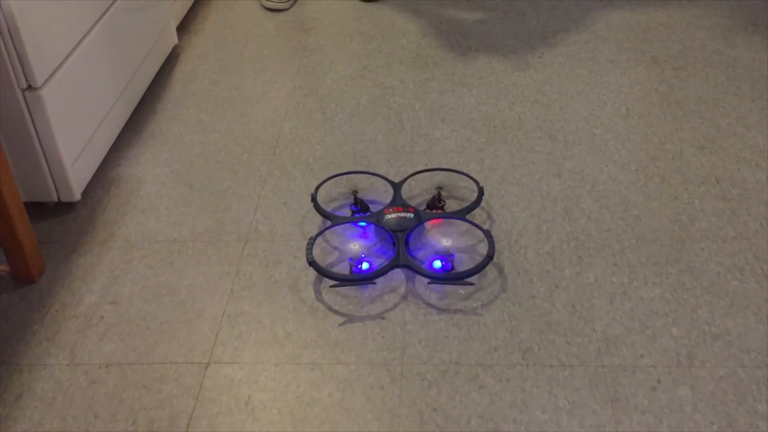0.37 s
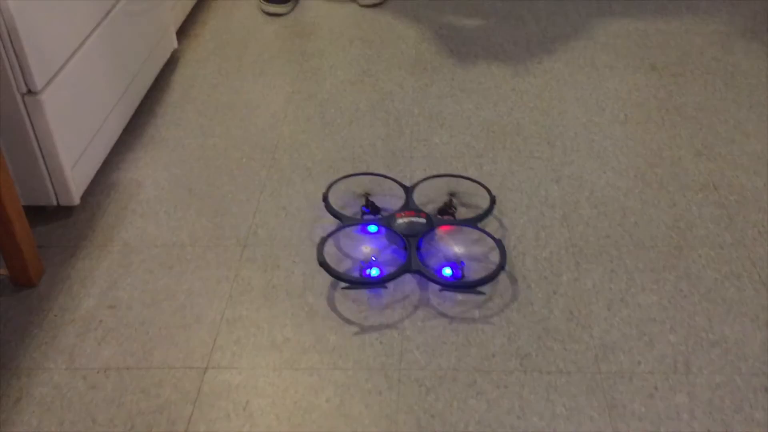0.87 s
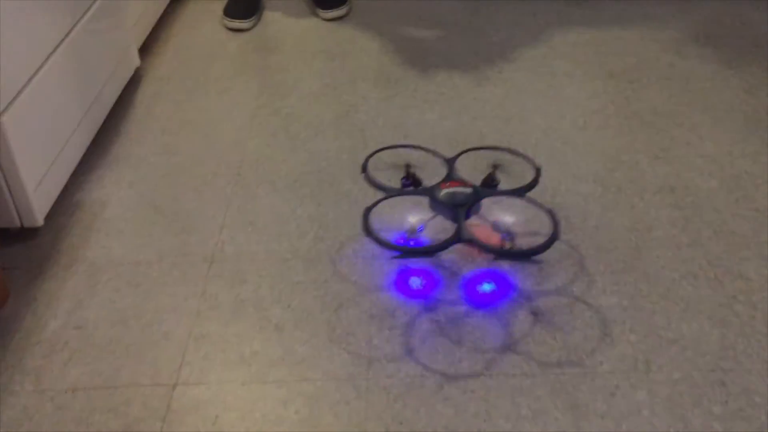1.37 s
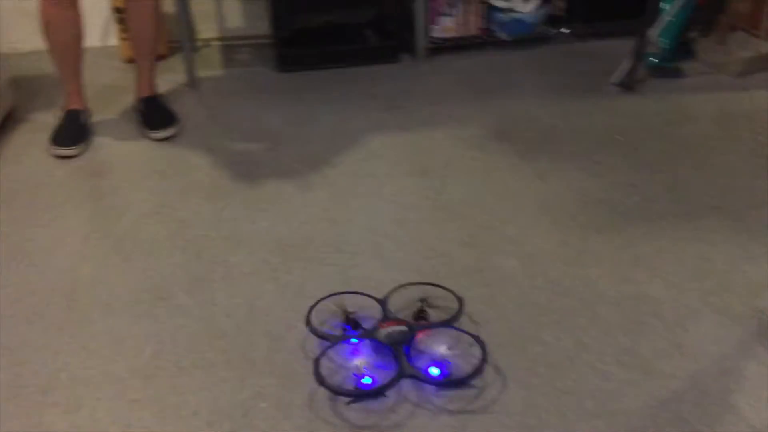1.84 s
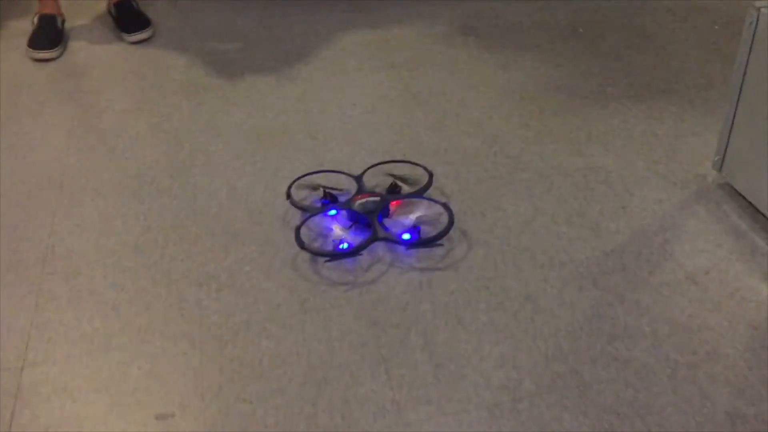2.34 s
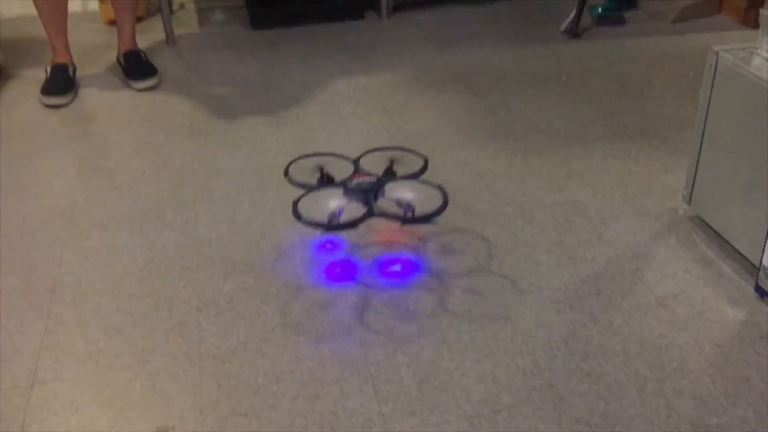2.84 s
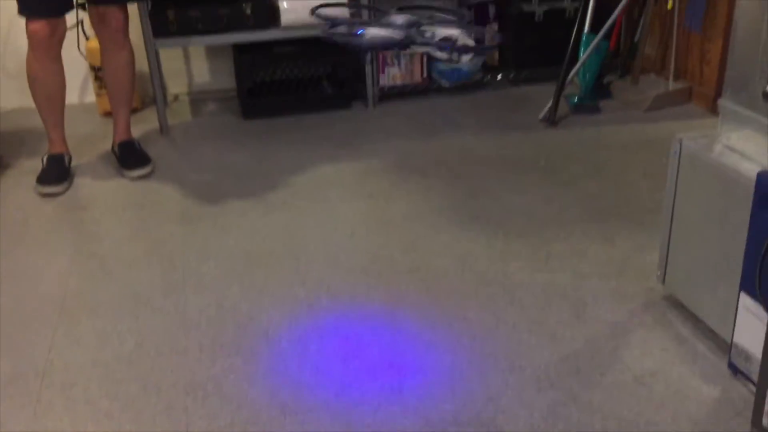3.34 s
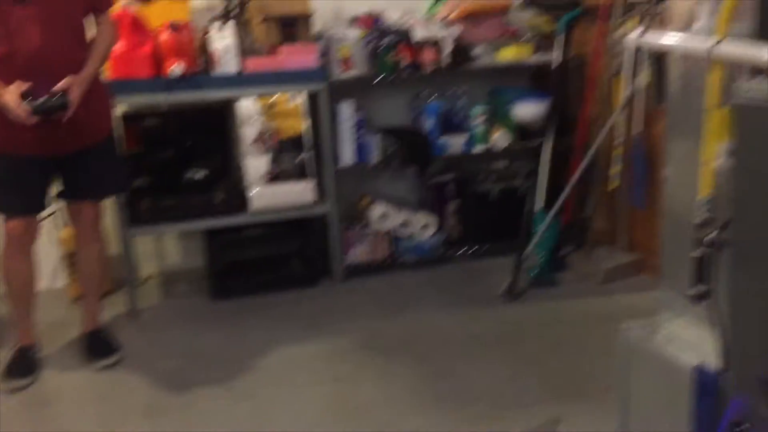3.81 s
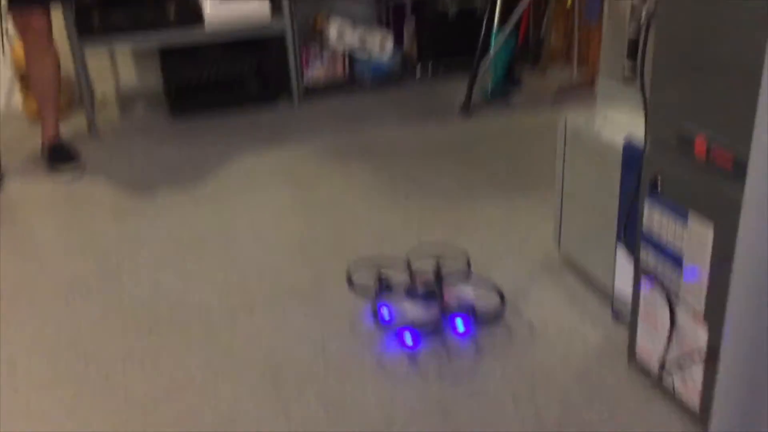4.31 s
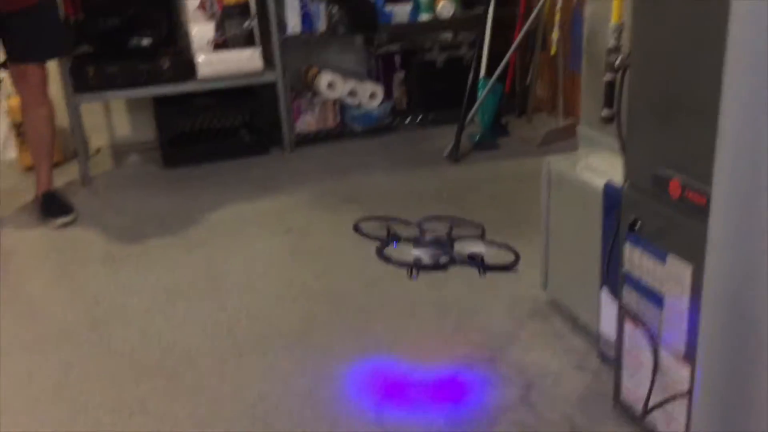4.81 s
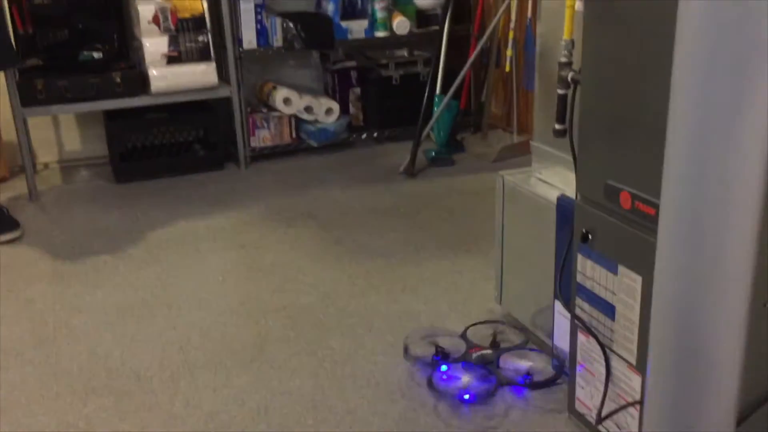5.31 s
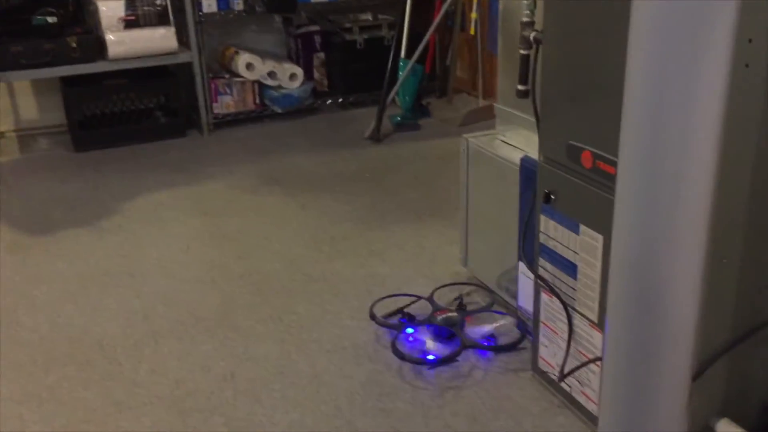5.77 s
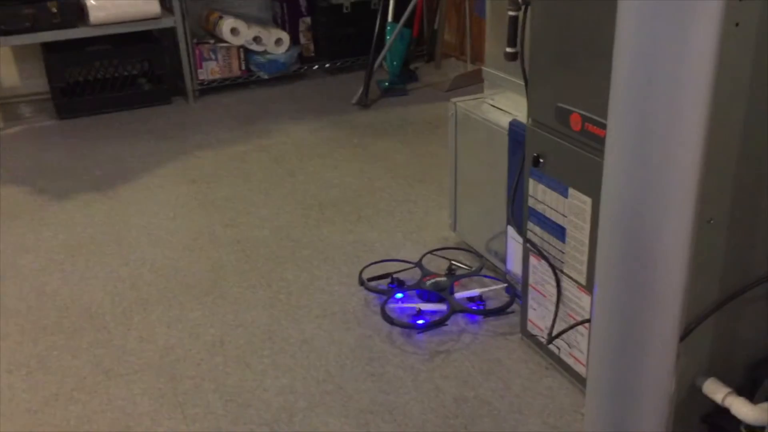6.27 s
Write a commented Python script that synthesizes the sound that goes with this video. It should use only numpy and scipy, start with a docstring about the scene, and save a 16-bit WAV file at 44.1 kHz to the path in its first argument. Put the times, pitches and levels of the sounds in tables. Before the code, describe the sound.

Thin geared motors rev up and coast down three times, with rattling plastic, airy blade hiss and clattering landings over faint ventilation rumble.

```python
"""Toy drone hopping in a room

A small four-rotor drone hops three times over a hard floor. Each geared motor whines at its tooth-mesh
rate, gear play rattles the light frame, the arms hum and turbulent air hisses off the blades.
Each hop ends in a bouncing knock: cracks and chatter that ring the frame modes.
Feedback delays give the room's echo; ventilation rumbles underneath as coloured noise."""
import sys
import numpy as np
from scipy import signal
from scipy.fft import rfft, irfft, next_fast_len
from scipy.io import wavfile
from scipy.ndimage import uniform_filter1d

SR = 44100
rng = np.random.default_rng(int(sys.argv[2]) if len(sys.argv) > 2 else 0)


def generate_wav(signal):
    """Clip the signal to [-1, 1] and save it as 16-bit WAV at the path in sys.argv[1]."""
    frames = np.transpose(np.atleast_2d(signal))
    scaled = np.clip(frames, -1, 1) * 32767
    pcm = np.round(scaled).astype(np.int16)
    wavfile.write(sys.argv[1], SR, pcm)


def gain_from_db(level_db):
    """Convert decibel levels to linear amplitude factors (20 dB per decade)."""
    decades = np.asarray(level_db, float) / 20
    return 10 ** decades


N = 282240   # samples, 6.4 s
PINION_TEETH = 11   # mesh cycles per motor turn


def rms_one(x):
    """Normalisation: scale to unit rms."""
    return x / np.sqrt(np.mean(x ** 2) + 1e-20)


def in_time(rows):
    """Linear interpolation: table columns become sample-by-sample curves."""
    time_s, *columns = np.transpose(rows)
    return [np.interp(np.arange(N) / SR, time_s, column) for column in columns]


def filtered(x, order, edge_hz, kind):
    """Butterworth filtering: a passband that is maximally flat."""
    return signal.sosfilt(signal.butter(order, edge_hz, kind, fs=SR, output="sos"), x)


def coloured(x, spectrum):
    """Spectral shaping: weight x by a spectrum read on a log-frequency axis."""
    hz, level_db = np.transpose(spectrum)
    grid = np.maximum(np.fft.rfftfreq(N, 1 / SR), 1)
    return irfft(rfft(x) * gain_from_db(np.interp(np.log(grid), np.log(hz), level_db)), N)


def decaying(x, decay_s):
    """Exponential relaxation: each impulse dies away with time constant decay_s."""
    return signal.lfilter([1], [1, -np.exp(-1 / (decay_s * SR))], x + 1e-18)


def drift(rate_hz):
    """Narrow-band randomness: noise through a double one-pole low-pass, run in, with unit rms."""
    r = np.exp(-2 * np.pi * rate_hz / SR)
    noise = rng.standard_normal(N + SR // 4)
    return rms_one(signal.lfilter([1], [1, -2 * r, r * r], noise)[SR // 4:])


def complex_drift(rate_hz):
    """Random modulation: two independent quadratures spread a carrier into a noise band."""
    return drift(rate_hz) + 1j * drift(rate_hz)


def ring(clicks, hz, t60):
    """Damped resonance: a unit click sets a sine of initial height 1 ringing."""
    r, w = gain_from_db(-60 / (t60 * SR)), 2 * np.pi * hz / SR
    return signal.lfilter([0, np.sin(w)], [1, -2 * r * np.cos(w), r * r], clicks + 1e-18)


def grains(per_s, spread_db):
    """Shot noise: random clicks of random sign, a few much larger than the rest."""
    sizes = gain_from_db(spread_db * np.minimum(rng.exponential(1, N), 5)) * rng.choice([-1, 1], N)
    return sizes * (rng.random(N) < per_s / SR)


# tooth-mesh rate each gear pair heads for, one list per hop; power is off between hops:
# time_s, motor_1_hz, motor_2_hz, motor_3_hz, motor_4_hz
THROTTLE = [
    [(-.17, 3770, 3070, 3210, 2680), (.3, 3935, 2980, 3293, 2720), (.5, 4010, 3080, 3340, 2790),
     (.6, 4130, 3825, 3350, 2850), (.78, 4060, 3820, 3377, 3070), (.92, 4200, 3870, 3710, 3356),
     (1.0, 4300, 3964, 3900, 3535), (1.08, 4435, 4160, 4060, 3620), (1.22, 4640, 3945, 4110, 3880),
     (1.33, 4200, 3890, 4126, 3886), (1.44, 4475, 3990, 4170, 4040), (1.5, 4140, 3964, 3770, 3640)],
    [(2.44, 1800, 1613, 1493, 1284), (2.6, 4570, 4200, 3920, 3667), (2.72, 5500, 4750, 5100, 4200),
     (2.82, 5900, 5040, 5425, 4835), (3.1, 5990, 5060, 5520, 5330), (3.2, 5750, 5250, 5520, 4790),
     (3.29, 5300, 4710, 5010, 4320)],
    [(3.91, 3020, 4600, 2700, 4900), (4.08, 3500, 4440, 2950, 4910), (4.16, 3900, 4410, 3130, 4770),
     (4.24, 4017, 4240, 3814, 4900), (4.42, 4105, 4405, 3887, 4980), (4.56, 4256, 4610, 3970, 5123),
     (4.71, 4240, 4435, 3984, 4676), (4.8, 3205, 3370, 3000, 3630), (4.94, 2050, 2586, 1898, 2300)],
]
# relative air drag of the four rotors, so each coasts down at its own pace: drag_ratio
DRAG_SHARE = (.8, 1.0, .9, 1.25)


def mesh_rates():
    """Rotor dynamics: inertia lags behind the throttle; unpowered, air drag and friction brake."""
    step_s = .004
    spin_up_s, most_hz_per_s = .06, 15000   # lag, and limit on acceleration
    drag_per_cycle = .0009 * np.array(DRAG_SHARE)
    friction_hz_per_s = 250
    t = np.arange(THROTTLE[0][0][0], N / SR + step_s, step_s)
    goals = np.zeros((len(t), 4))
    for hop in THROTTLE:
        time_s, *columns = np.transpose(hop)
        on = (t >= time_s[0]) & (t < time_s[-1])
        goals[on] = np.transpose([np.interp(t[on], time_s, column) for column in columns])
    hz, out = np.ones(4), []
    for goal in goals:
        chase = np.minimum((goal - hz) / spin_up_s, most_hz_per_s)
        coast = -drag_per_cycle * hz ** 2 - friction_hz_per_s
        hz = np.maximum(hz + (chase if goal[0] else coast) * step_s, 1)
        out.append(hz)
    return np.array(in_time(np.column_stack([t, out])))


def speed_level_db(meshes, top_db, db_per_octave):
    """Power law of speed: a steep rise at low speed that flattens towards top_db at full speed."""
    full_hz = 2700   # mean mesh rate above which the layers grow little louder
    return top_db - db_per_octave * np.log2(1 + (full_hz / meshes.mean(axis=0)) ** 4) / 4


# how purely each gear pair sings, relative: level_db
GEAR_TONE = (1.5, 3, 0, -1)
# how cleanly the gears sing: time_s, tone_over_smeared_band_db, break_up_into_strands_db
PURITY = [(0, 1, 4.5), (.75, 2, 4.5), (1.0, 5, 2.5), (1.15, 6.5, 2), (1.5, 5, 3), (2.5, 2, 3),
          (2.75, -1, 3.5), (2.9, 3.5, 3), (3.15, 3.5, 3), (3.3, 0, 4), (4, -6, 3), (4.2, -3, 3),
          (4.7, -1, 3), (4.85, 3, 2.5), (6, 0, 3)]
# how well the frame radiates the running gear: pitch_hz, relative_level_db (per Hz)
BODY = [(300, -11), (700, -12.5), (1400, -3), (2100, -9), (3000, -5.5), (4000, -4.5), (4800, -6.5),
        (6300, -3), (7500, -9), (9000, -4.5), (10500, -12), (11200, -9.5), (15500, -13.5), (17000, -27)]


def gear_whine(meshes, wobble, blur_hz, octave_db, grind_db):
    """Gear meshing: per motor a thin tone in a smeared band at the mesh rate, a wider band at its octave."""
    tone_loss_db, band_gain_db = 4.0, 0.3   # per octave per s: glides blur the tone, lift the whole band
    whirr_db = -2.5   # a broad whirr around each mesh band
    bite_hz, bite_power = 2950, 3.5   # slower teeth barely touch; their tone dies into the grinding
    steady_db, broken_db = in_time(PURITY)
    out = 0
    for mesh_hz, tone_db in zip(meshes, GEAR_TONE):
        octaves_per_s = np.abs(np.gradient(np.log2(mesh_hz))) * SR
        glide = uniform_filter1d(octaves_per_s, size=2000)
        clarity_db = steady_db - tone_loss_db * glide
        phase = 2 * np.pi * np.cumsum(mesh_hz * (1 + wobble * drift(32.1))) / SR
        # an eccentric gear gives side tones one turning rate away
        eccentric = 1 + .5 * np.cos(phase / PINION_TEETH + 2 * np.pi * rng.random())
        broken = gain_from_db(broken_db * drift(14.6))   # tooth contact comes and goes in short strands
        # uneven teeth smear each band, the octave far wider
        tone = gain_from_db(tone_db + clarity_db) * broken
        smear = complex_drift(blur_hz) * np.sqrt(broken)
        whirr = gain_from_db(whirr_db) * complex_drift(3 * blur_hz)
        mesh = (tone + smear + whirr) * gain_from_db(band_gain_db * glide) * np.exp(1j * phase)
        octave = gain_from_db(octave_db) * complex_drift(5 * blur_hz) * np.exp(2j * phase)
        # faster teeth hit harder
        force = np.sqrt(mesh_hz / 4000) * np.minimum(mesh_hz / bite_hz, 1) ** bite_power
        out = out + np.real((mesh + octave) * eccentric) * force
    grinding = filtered(rng.standard_normal(N), 4, [2200, 4400], "band")
    out = coloured(out + gain_from_db(grind_db) * rms_one(grinding), BODY)
    return out / np.sqrt(uniform_filter1d(out ** 2, size=8000) + 1e-12)   # even running level


# pitch of the frame part that meets the floor and rings loudest: time_s, pitch_hz
STRUCK_PART = [(1.8, 1240), (1.83, 1068), (1.92, 1425), (1.97, 1080), (2.1, 1050), (3.95, 1100),
               (3.99, 1366), (4.1, 1320), (5.19, 850), (5.21, 1250), (5.4, 1203), (5.65, 1200)]


def struck_lift(hz):
    """Modal excitation: gain over time of the mode at hz, by how near it lies to the struck part."""
    lift_db, half_width_octaves = 4, 0.27
    part_hz, = in_time(STRUCK_PART)
    distance = np.log2(hz / part_hz) / half_width_octaves
    return gain_from_db(lift_db * np.exp(-distance ** 2))


# modes of the foam and plastic frame when ringing freely: pitch_hz, relative_level_db, t60_s
FRAME = [(292, -19.5, 0.019), (476, -51, 0.012), (634.6, -15.5, 0.094), (856, -7, 0.036),
         (890, -20.5, 0.057), (1045, -7.5, 0.06), (1094, -13, 0.07), (1199, -18.5, 0.088),
         (1261, -8, 0.053), (1226, -4.5, 0.041), (1530, -5.5, 0.016), (1573, -1.5, 0.015),
         (1569, -9, 0.078), (1800, -8.5, 0.03), (2050, -4.5, 0.021), (2547, -3, 0.018), (2920, -9.5, 0.045),
         (3160, -1, 0.0097), (3900, -3, 0.0074)]


def frame_rattle(per_s, ring_share, struck=False):
    """Modal synthesis: dense ticks ring the frame modes for ring_share of their free decay."""
    out = 0
    for hz, level_db, t60 in FRAME:
        ticks = grains(per_s, spread_db=4.0) * (struck_lift(hz) if struck else 1)
        out = out + gain_from_db(level_db) * ring(ticks, hz, t60 * ring_share)
    return out


# hum of the motor arms under running gears, one list per hop: time_s, pitch_hz, relative_level_db
ARM_HUM = [
    [(0, 1350, 2.5), (.55, 1400, -2), (.75, 1450, 3), (1.0, 1380, -2.5), (1.3, 1450, 0), (1.5, 1500, 1),
     (1.75, 1400, -12.5)],
    [(2.4, 1180, -15), (2.5, 1200, 9), (2.7, 1290, 6.5), (2.85, 1330, 0.5), (3.0, 1480, 4),
     (3.3, 1480, 2.5), (3.5, 1480, 9.5), (3.85, 1400, -4.5)],
    [(4.1, 1500, 5), (4.3, 1450, -5.5), (4.45, 1480, 6), (4.6, 1420, 1), (4.75, 1460, 13), (4.9, 1400, 4),
     (5.15, 1400, -0.5)],
]


def arm_hum():
    """Moving resonance: gear ticks ring the motor arms, in a frame that rotates at the arm pitch."""
    t60_s = .016
    hz, level_db = in_time([row for hop in ARM_HUM for row in hop])
    phase = 2 * np.pi * np.cumsum(hz) / SR
    ticks = grains(900, spread_db=3.0) * np.exp(-1j * phase)
    rung = signal.lfilter([1], [1, -gain_from_db(-60 / (t60_s * SR))], ticks + 1e-18)
    return gain_from_db(level_db + 2.34 * drift(2.7)) * np.real(rung * np.exp(1j * phase))


def blade_hiss(meshes, chop, flicker_db):
    """Aerodynamic noise: grainy turbulence chopped at each motor's turning rate; a rasp joins at speed."""
    gate = 1
    for mesh_hz in meshes:
        turns = np.cumsum(mesh_hz) / SR / PINION_TEETH + rng.random()
        gate = gate + chop * np.cos(2 * np.pi * turns)
    air = rng.standard_normal(N) + 0.69 * rms_one(grains(4000, spread_db=0.5))
    hiss = coloured(air * gate * gain_from_db(flicker_db * drift(5.3)), BODY)
    treble = filtered(hiss, 4, 6500, "high")   # the hiss level is set by its treble
    # the gear housings ring when the blades load them
    rasp_hz, width_hz, rasp_db = 9300, 1300, -6
    rasp = filtered(grains(3000, spread_db=2.0), 2, [rasp_hz - width_hz / 2, rasp_hz + width_hz / 2], "band")
    load = np.clip((np.mean(meshes, axis=0) - 3300) / 800, 0, 1)   # thrust builds near lift-off speed
    return hiss / np.std(treble) + gain_from_db(rasp_db + drift(10)) * load * rms_one(rasp)


# floor contacts, levels before the layer trims: start_s, level_db, crack_re_level_db
KNOCKS = [(1.796, -11.5, -16.5), (1.803, -13.5, -9.5), (1.831, -19, -41), (1.884, -35, -11),
          (1.917, -24.5, -9.5), (1.922, -30, -25), (1.962, -28, -20), (1.991, -37, -25), (2.039, -49, -30),
          (2.076, -47, -6), (2.447, -33.5, -20), (3.896, -32.5, -19), (3.906, -36.5, -3.5),
          (3.945, -19.5, -2), (3.955, -7.5, -19.5), (3.983, -8.5, -7.5), (3.986, -15.5, -27),
          (3.998, -22, -35), (4.021, -34, -27), (5.19, -21.5, -2.5), (5.196, -20.5, -19), (5.21, -13.5, -7),
          (5.221, -19, -22.5), (5.231, -22, -24), (5.245, -26, -24), (5.287, -23, -23),
          (5.382, -23.5, -6.5), (5.408, -26.5, -32), (5.452, -29.5, -9.5), (5.474, -30.5, -39),
          (5.505, -43, -33.5), (5.575, -44, -33), (5.622, -44, -23.5), (5.64, -41.5, -39),
          (5.759, -53, -12), (6.101, -53.5, -10)]


def contacts(levels_db):
    """Impulsive excitation: one click per floor contact."""
    clicks = np.zeros(N)
    clicks[np.round(np.transpose(KNOCKS)[0] * SR).astype(int)] = gain_from_db(levels_db)
    return clicks


def knocks(chatter_s, crack_s, buzz_s, body_db, crack_db):
    """Impact sound: a bright crack plus a dying chatter of small touches that ring the frame modes."""
    _, level_db, bright_db = np.transpose(KNOCKS)
    blows = contacts(level_db + body_db)
    cracks = contacts(level_db + bright_db + crack_db)
    dying = decaying(blows, chatter_s)
    body = 0
    for hz, mode_db, t60 in FRAME:
        # each mode is pushed its own way
        push = rng.choice([-1, 1], N) * gain_from_db(rng.normal(0, 2.9, N))
        chatter = dying * grains(1500, spread_db=4.0)
        strike = (0.36 * blows * push + 0.35 * chatter) * struck_lift(hz)
        body = body + gain_from_db(mode_db) * ring(strike, hz, t60)
    body = filtered(body, 2, 220, "high")   # a light frame has no bass
    snap = decaying(cracks, crack_s)
    buzz = .35 * decaying(cracks, buzz_s)   # loose parts buzz on
    bright = filtered(rng.standard_normal(N), 2, [1800, 12000], "band")
    return body + (snap + buzz) * bright


def settling():
    """Energy decay: each contact leaves the loose frame rattling dully in uneven, fading lumps."""
    settle_db, settle_s, cut_hz = -32, 0.084, 2600
    blows = contacts(np.transpose(KNOCKS)[1] + settle_db)
    strength = decaying(blows, settle_s) * gain_from_db(2.4 * drift(40))
    rattle = frame_rattle(200, ring_share=0.43, struck=True)
    return strength * rms_one(filtered(rattle, 2, cut_hz, "low"))


def room(x):
    """Reverberation: ten feedback delays, duller on every round, summed on a padded frequency grid."""
    t60_s, wall_cut_hz = 0.33, 3050   # the decay time holds for the bass
    size = next_fast_len(N + SR)
    w = 2j * np.pi * np.fft.rfftfreq(size)
    dull = np.exp(-2 * np.pi * wall_cut_hz / SR)
    walls = (1 - dull) / (1 - dull * np.exp(-w))
    delays_s = np.geomspace(.011, .043, 10) * rng.uniform(0.94, 1.05, 10)
    response = 0
    for k, lag in enumerate((delays_s * SR).astype(int)):
        loop = gain_from_db(-60 * lag / SR / t60_s) * walls * np.exp(-w * lag)
        response = response + (-1) ** k * loop / (1 - loop)
    return irfft(rfft(x, size) * response, size)[:N]


# ventilation noise spectrum: pitch_hz, relative_level_db (per Hz)
RUMBLE = [(59, -33), (100, -0.5), (160, -7), (197, -12), (343, -12), (461, -20), (535, -14), (1080, -26),
          (1310, -34.5), (4870, -49), (15000, -52.5), (16000, -81.5)]
# duct resonances, rms level before the sway: pitch_hz, width_hz, level_db
RUMBLE_HUM = [(88.5, 32, -58.5), (109, 59, -59), (157.1, 13, -59.5), (250.8, 32, -59.5)]


def ventilation(sway_db):
    """Duct acoustics: dull air noise with a few low resonances humming in it."""
    out = gain_from_db(-53) * rms_one(coloured(rng.standard_normal(N), RUMBLE))
    for hz, width_hz, level_db in RUMBLE_HUM:
        hum = ring(rng.standard_normal(N), hz, 2.3 / width_hz)
        out = out + gain_from_db(level_db) * rms_one(hum)
    return out * gain_from_db(sway_db * drift(5.3))


# loudness of whine, frame rattle and blade hiss over time, relative to the level set by speed:
# time_s, whine_db, frame_rattle_db, blade_hiss_db
LAYER_LOUDNESS = [(0, -5, -2.5, -9.5), (.16, 0.5, 0, 2), (.28, 1.5, 3.5, 1.5), (.55, 1, 2.5, 1),
                  (.82, 0, 3, 0), (.98, -1, 4, 0.5), (1.16, 4, 4.5, -1.5), (1.34, -1, 5, 1),
                  (1.46, 2, 1.5, 1.5), (1.62, 0.5, -2.5, 0.5), (1.95, 1, 4.5, 1), (2.3, -3.5, -0.5, -1.5),
                  (2.47, -1, 3.5, -4), (2.55, 4, -3, 0.5), (2.73, -0.5, 5, 0.5), (2.82, 0.5, -1, 1.5),
                  (3.1, 0.5, 1.5, 2.5), (3.4, -0.5, -4, -0.5), (3.6, -1, -4.5, -1), (3.85, 0.5, 0.5, -3),
                  (4.12, 0, -1.5, -0.5), (4.28, 2.5, 8, -0.5), (4.5, -0.5, 2.5, 1.5), (4.7, -2.5, -1.5, 1),
                  (4.79, 1.5, -2.5, 0), (4.88, -1, -17, 1.5), (4.97, 2, -5, 1.5), (5.15, 1, -3.5, -2),
                  (5.45, 8, 8, 1.5), (5.7, -15, -2.5, -8.5)]


def scene():
    """Superposition: drone and its echoes over the rumble; one microphone feeds both channels."""
    whine_db, rattle_db, hiss_db = in_time(LAYER_LOUDNESS)
    meshes = mesh_rates()
    whine = gear_whine(meshes, wobble=.002, blur_hz=210, octave_db=-3.0, grind_db=3.0)
    rattle = rms_one(frame_rattle(900, ring_share=0.2) + arm_hum())
    hiss = blade_hiss(meshes, chop=0.077, flicker_db=0.33)
    drone = gain_from_db(speed_level_db(meshes, top_db=-38, db_per_octave=19) + whine_db) * whine
    drone += gain_from_db(speed_level_db(meshes, top_db=-46, db_per_octave=7.3) + rattle_db) * rattle
    drone += gain_from_db(speed_level_db(meshes, top_db=-43.5, db_per_octave=20.3) + hiss_db) * hiss
    drone += knocks(chatter_s=0.0087, crack_s=0.00098, buzz_s=0.033, body_db=-16, crack_db=3.0)
    drone += settling()
    mono = drone + gain_from_db(-13.5) * room(drone) + ventilation(sway_db=1.47)
    return np.array([mono, mono])


def low_pass(x):
    """Removes everything above the highest recorded frequency."""
    return signal.sosfilt(signal.butter(12, 16610, fs=SR, output="sos"), x)


def record(dry):
    """Band limiting: the microphone drops the deepest bass and the top treble."""
    bass_cut = signal.butter(3, 55, "high", fs=SR, output="sos")
    top_cut = signal.cheby2(10, 40, 16200, fs=SR, output="sos")
    mix = signal.sosfilt(np.vstack([bass_cut, top_cut]), dry)
    return low_pass(mix)


dry = scene()
out = record(dry)
generate_wav(out)
```